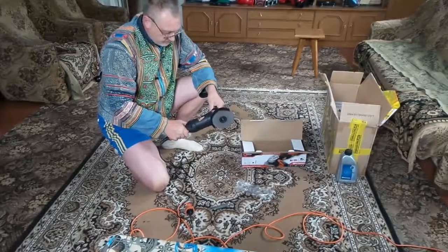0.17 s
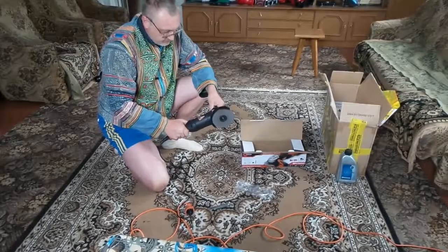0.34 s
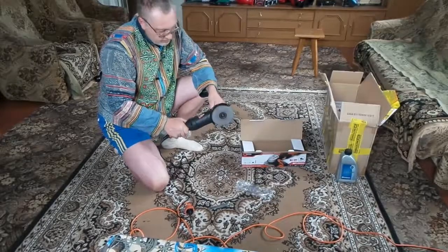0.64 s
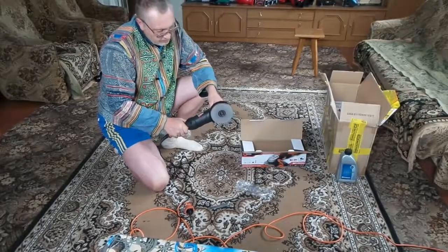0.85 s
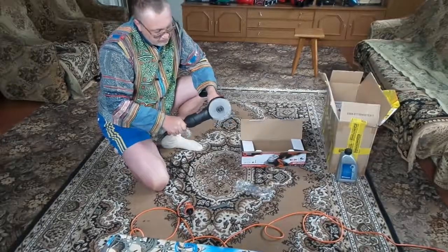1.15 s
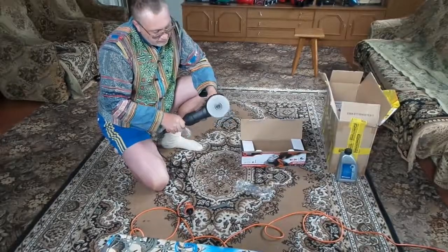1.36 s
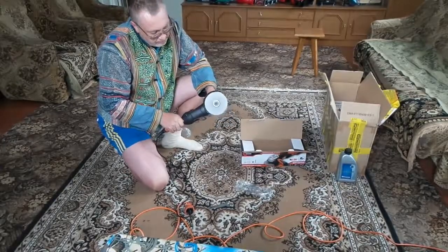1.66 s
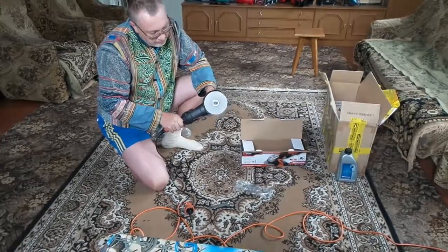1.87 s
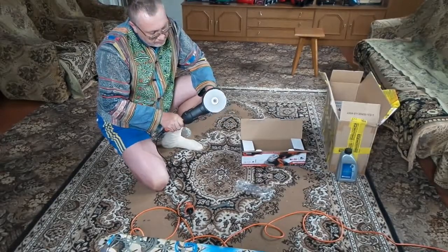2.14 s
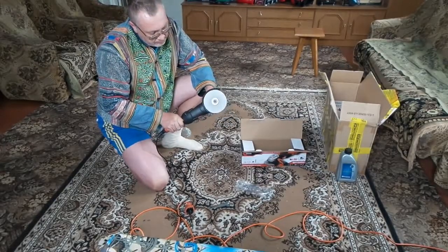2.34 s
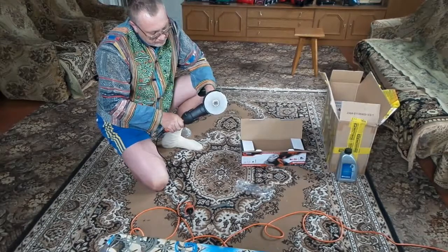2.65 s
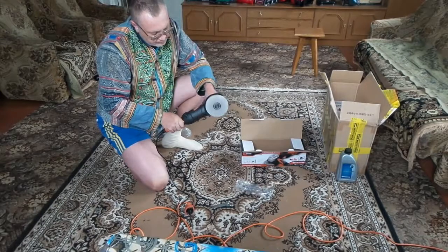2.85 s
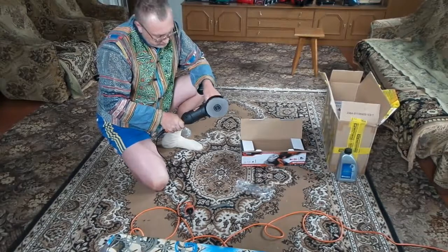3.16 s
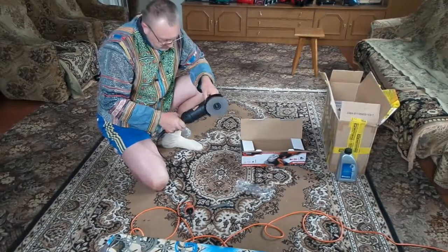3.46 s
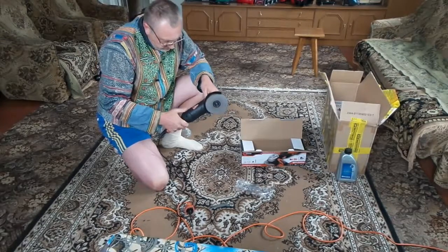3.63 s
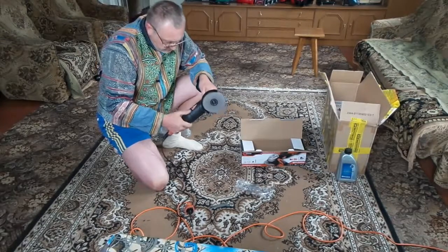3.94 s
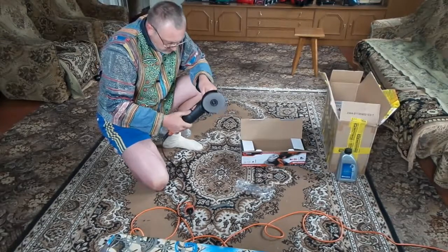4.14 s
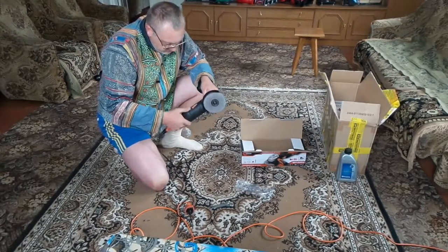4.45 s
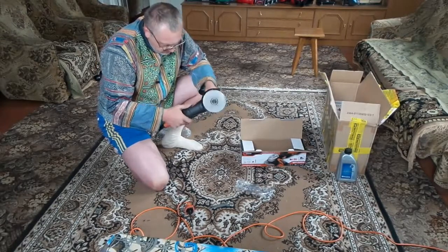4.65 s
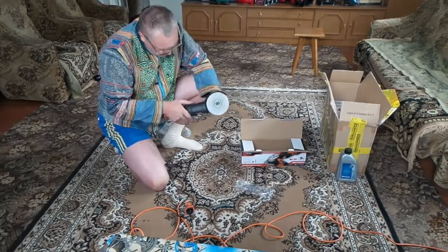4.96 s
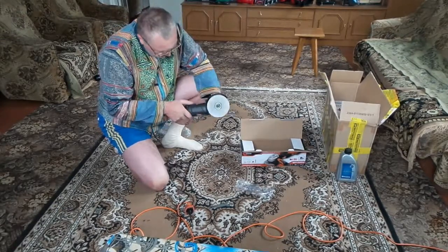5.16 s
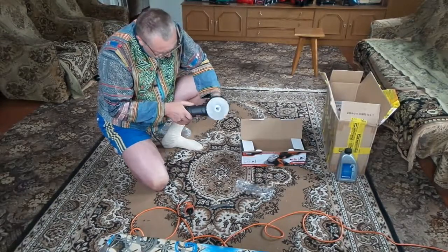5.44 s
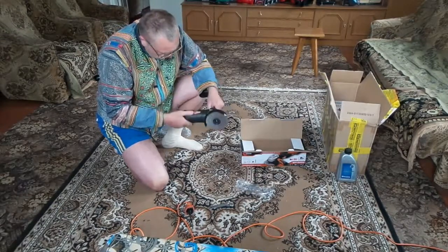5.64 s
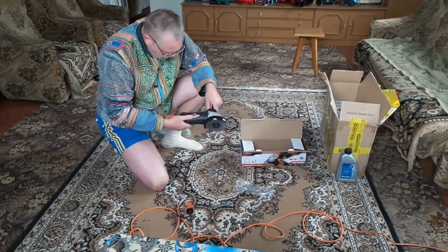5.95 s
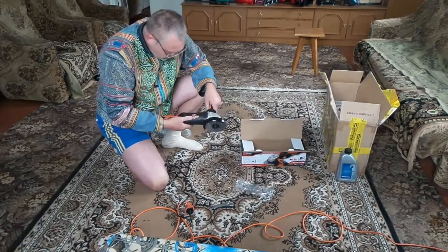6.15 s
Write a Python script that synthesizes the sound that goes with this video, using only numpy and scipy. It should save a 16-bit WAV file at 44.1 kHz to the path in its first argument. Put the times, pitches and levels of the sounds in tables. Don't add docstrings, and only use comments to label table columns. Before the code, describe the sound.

From the start an angle grinder is already spinning free at full speed: a dense, rough metallic whir, bright gear rattle, airy hiss and wavering high whines, rising very slightly until about 0.3 s. From 0.45 s it is turned down; pitch slides quickly, then more gently, settling lower by about 2.5 s. Soft low handling thumps come near 1.7 and 2.2 s, and light guard clangs from 2.7 to 3.3 s. At about 3.5 s the switch is released and pitch falls steadily. The smooth whir breaks into coarse rattling, with irregular knocks and ringing clangs strongest from 4 to 4.8 s. After 5 s it fades fast into separate dull clacks, tiny ticks around 6 s, then near silence with faint room tone and hum. Carpeted room, short reflections, stereo microphone a couple of metres away, no cutting.

```python
import sys
import numpy as np
from scipy import signal
from scipy.fft import rfft, irfft, next_fast_len
from scipy.io import wavfile
from scipy.ndimage import uniform_filter1d

SR = 44100
rng = np.random.default_rng(int(sys.argv[2]) if len(sys.argv) > 2 else 0)


def to_linear_factor(level_db):
    exponent = np.asarray(level_db, float) / 20
    return 10 ** exponent


def materialize(psi):
    bounded = np.clip(np.atleast_2d(psi).T, -1, 1)
    quanta = np.round(bounded * 32767).astype(np.int16)
    wavfile.write(sys.argv[1], SR, quanta)


N = 277830
OFF_S = 3.47
GEAR_RATIO = 2.96


def evened(x):
    return x / np.sqrt(np.mean(x ** 2) + 1e-20)


def columns(rows):
    s, *rest = np.transpose(rows)
    return [np.interp(np.arange(N) / SR, s, column) for column in rest]


def by_speed(law, speed_hz):
    return np.interp(speed_hz, *np.transpose(law))


def wander(top_hz):
    low_pass = signal.butter(2, top_hz, fs=SR, output="sos")
    return evened(signal.sosfilt(low_pass, rng.standard_normal(N)))


def coloured(x, outline):
    f, db = np.transpose(outline)
    size = next_fast_len(N + 4096)
    hz = np.fft.rfftfreq(size, 1 / SR)
    gain = to_linear_factor(np.interp(np.log(hz + 1), np.log(f + 1), db))
    return irfft(rfft(x, size) * gain, size)[:N]


def rings(x, modes):
    f = np.abs(np.fft.fftfreq(8192, 1 / SR)) + 1
    lowest_hz = min(mode[0] for mode in modes)
    highest_hz = max(mode[0] for mode in modes)
    power = sum(to_linear_factor(db) ** 2 / (1 + ((f - hz ** 2 / f) / width) ** 2) for hz, width, db in modes)
    power = power / (1 + (lowest_hz / 2 / f) ** 4)
    power = power / (1 + (f / highest_hz / 1.24) ** 6)
    log_gain = np.log(power + 1e-10) / 2
    phase = -np.imag(signal.hilbert(log_gain))
    body = np.fft.ifft(np.exp(log_gain + 1j * phase)).real[:4096]
    return signal.oaconvolve(x, body / np.linalg.norm(body))[:N]


def chatter(x, decay_s):
    fall = np.exp(-1 / (decay_s * SR))
    return signal.lfilter([np.sqrt(1 - fall ** 2)], [1, -fall], x) * rng.standard_normal(N)


def struck(events, level_db, boost_db, most_db):
    s, peak_db = np.transpose(events)
    at = (s * SR).astype(int)
    train = np.zeros(N)
    train[at] = to_linear_factor(np.minimum(peak_db - level_db[at], most_db) + boost_db)
    return train


def quiet_room(hum_hz=370, hum_db=-74, tone_db=-61):
    # freq_hz, level_db (per Hz)
    tone_outline = [(24, 13), (40, -11), (59, -28), (142, -1.5), (186, -5), (355, 8.5), (1290, -17),
                    (1530, -36), (15000, -10.5)]
    tone = np.array([evened(coloured(v, tone_outline)) for v in rng.standard_normal((2, N))])
    return to_linear_factor(tone_db) * tone + to_linear_factor(hum_db) * np.sin(2 * np.pi * hum_hz * np.arange(N) / SR)


def low_rumble(length_s=0.1, coast_db=-72, bump_db=-5):
    # start_s, peak_db
    bumps = [(0.165, -69), (0.559, -68), (1.256, -74), (1.704, -53.5), (1.836, -82), (2.236, -54),
             (2.609, -59), (2.8, -56), (2.947, -57), (3.253, -59), (3.388, -60.5), (3.522, -61.5),
             (3.81, -72), (3.813, -66), (3.955, -53), (4.307, -66.5), (4.994, -64), (5.406, -66)]
    # freq_hz, level_db (per Hz)
    rumble_outline = [(20, -8), (60, -4), (120, -4), (260, -1), (340, -30)]
    s, peak_db = np.transpose(bumps)
    t = np.arange(0, N, 64) / SR
    humps = np.exp(-((t - s[:, None] - length_s / 2) / length_s * 3) ** 2)
    swell = np.repeat(to_linear_factor(peak_db + bump_db) @ humps, 64)[:N]
    coast = np.interp(np.arange(N) / SR, (OFF_S, 4.4, 5.8, 6.2), (0.52, 1, 0.8, .1))
    rumble = np.array([evened(coloured(v, rumble_outline)) for v in rng.standard_normal((2, N))])
    rumble = (rumble + rumble.sum(0)) / 2
    return rumble * (swell + to_linear_factor(coast_db) * coast)


def room(x, drift_hz=.7):
    # freq_hz, t60_s
    decay = [(200, .33), (1000, .28), (4000, .22), (12000, .16)]
    size = SR // 3
    taps = np.zeros((3, 2, size))
    at = np.arange(120, size - 22, 22)
    at = at + rng.integers(0, 22, (3, 2, len(at)))
    np.put_along_axis(taps, at, rng.choice([-1., 1.], at.shape), 2)
    hz, t, z = signal.stft(taps, SR, nperseg=256)
    f, t60_s = np.transpose(decay)
    fade = to_linear_factor(-60 * t / np.interp(hz, f, t60_s)[:, None])
    tails = signal.istft(z * fade, SR, nperseg=256)[1]
    tails = tails / np.linalg.norm(tails, axis=-1, keepdims=True)
    turn = 2 * np.pi * (drift_hz * np.arange(N) / SR + np.arange(3)[:, None] / 3)
    fed = x * np.sqrt(2 / 3) * np.cos(turn)
    return signal.fftconvolve(fed[:, None], tails, axes=2)[..., :N].sum(0)


def whine(speed_hz, turns, bars=24, blades=31, waver_db=2.5):
    # multiple of armature, level_db
    overtones = [(.677, -11), (2, -7), (2.56, -3), (2.71, -8), (3, 0), (4, 1), (12, 7)]
    # armature_hz, level_db
    unbalance_law = [(10, -110), (188, -72), (205, -54), (235, -54), (250, -62), (258, -59), (260, -66),
                     (266, -68), (271, -53), (325, -49), (333, -66), (342, -66), (350, -49), (390, -46),
                     (402, -37)]
    overtone_law = [(10, -100), (135, -80), (160, -58), (230, -56), (265, -52), (400, -51)]
    bar_law = [(10, -110), (185, -62), (215, -42), (228, -38), (254, -37), (259, -46), (290, -57),
               (335, -64)]
    blade_law = [(10, -110), (185, -62), (220, -54), (270, -54), (300, -59), (328, -58), (345, -47),
                 (400, -47)]
    orders = [(1, unbalance_law, 0), (bars, bar_law, 0), (blades, blade_law, 0)]
    orders = orders + [(k, overtone_law, db) for k, db in overtones]
    lines = np.zeros(N)
    for k, law, db in orders:
        waver = waver_db * wander(3.3) * (1.3 + (1 < k < 20))
        level = np.sqrt(2) * to_linear_factor(by_speed(law, speed_hz) + db + waver)
        lines += level * np.sin(2 * np.pi * (k * turns + rng.random()))
    return lines


def backlash(turns, size_db=14, spread_db=4, miss=0.21):
    slap = np.diff(np.floor(turns / GEAR_RATIO + .4 * wander(20)), prepend=0) > 0
    keep, size = rng.random(N), rng.standard_normal(N)
    coasting = np.arange(N) > OFF_S * SR
    return slap * (keep > miss) * coasting * to_linear_factor(size_db + spread_db * size)


def teeth(turns, wobble=0.34):
    # start_s, knocks per s, size spread_db, smooth air noise share 0-1
    rattle = [(0, 2500, 3.5, .5), (2, 2200, 3.2, .5), (3.4, 2000, 3.2, .5), (4, 1500, 2.8, .5),
              (5.5, 900, 2.6, .5), (6.3, 500, 2.2, .6)]
    rate_hz, spread_db, air = columns(rattle)
    draw, size = rng.random((2, N))
    knock_db = spread_db * np.minimum(-np.log(size + 1e-9), 3.5)
    hits = to_linear_factor(knock_db) * (draw < rate_hz / SR)
    hits = hits / np.sqrt(uniform_filter1d(hits ** 2, SR // 3) + 1e-9)
    eccentric = 1 + np.clip(wobble, 0, .4) * np.cos(2 * np.pi * turns / GEAR_RATIO)
    return hits * eccentric, np.clip(air, 0, 1)


def gears(speed_hz, turns, face_db=-8, ring_db=-11, shell_db=-6, flutter_db=0.68, hiss_rattle=0.5):
    # start_s, head_db, disc face toward listener_db, disc rim toward listener_db
    loudness = [(0, -17, -8, 5), (.1, -18, -2.5, -46), (1, -20, -4, -32), (1.2, -19, -2, -27),
                (2.7, -20.5, 2, -23), (3.4, -19.5, 2, -3), (3.8, -20, -1, 5), (4.45, -24.5, 1, 1),
                (4.7, -25.5, 5, -4), (5.15, -28, 4.5, 0), (5.75, -38, -1.5, -1), (5.96, -49.5, 6, -17),
                (5.99, -47, 1, -4), (6.2, -64, 4, 0), (6.3, -76.5, 8, -8)]
    # start_s, peak_db
    coast_knocks = [(3.5622, -12), (3.5891, -1), (3.8016, -15), (3.9413, -13), (3.9827, -24), (4.066, -9),
                    (4.1189, -9), (4.1903, -9), (4.2142, -5), (4.3015, -5.5), (4.3349, -7.5),
                    (4.3614, -7.5), (4.4497, -4), (4.4726, -8), (4.5584, -8), (4.6417, -9.5), (4.6732, -10),
                    (4.7754, -3), (4.8084, -12.5), (4.8692, -9), (5.0453, -9), (5.0787, -15.5),
                    (5.0987, -19.5), (5.1645, -14.5)]
    # start_s, peak_db
    last_knocks = [(5.2694, -23), (5.3264, -14.5), (5.3974, -18), (5.463, -17), (5.6156, -27),
                   (5.6446, -37), (5.6775, -21), (5.7079, -41), (5.7369, -29), (5.8596, -26), (5.9095, -37),
                   (5.9718, -26.5), (6.0297, -32.5), (6.1584, -36.5)]
    # start_s, peak_db
    guard_clangs = [(2.6998, -22), (2.7846, -14), (2.8015, -26), (2.8251, -10.5), (2.976, -18),
                    (3.012, -25), (3.0864, -21), (3.1278, -16), (3.212, -21), (3.274, -12), (3.5404, -19),
                    (3.564, -25), (3.613, -12), (3.6431, -20.5), (3.8815, -17.5), (4.071, -7),
                    (4.1214, -10), (4.2263, -23), (4.2867, -15), (4.3366, -12), (4.421, -10), (4.4508, -17),
                    (4.5091, -11), (4.5347, -8), (4.5607, -9), (4.5935, -17), (4.6194, -24), (4.6743, -12),
                    (4.7423, -5), (4.7777, -13),
                    (5.3762, -20.5), (5.446, -20.5), (5.6166, -23), (5.662, -28), (5.684, -47),
                   (5.8192, -27), (5.91, -33), (5.9714, -51), (6.0492, -41), (6.1599, -41)]
    # freq_hz, width_hz, level_db
    head_modes = [(2420, 98, -9.5), (3770, 490, -2.5), (4130, 370, -0.5), (4740, 530, -1.5),
                  (4800, 410, 3.5), (5190, 130, -9), (3880, 657, -3.5), (2030, 320, -10.5)]
    guard_modes = [(1480, 60, -13), (1625, 45, 0), (1760, 50, -4), (1890, 80, -14), (1700, 500, -25)]
    casing_modes = [(690, 100, 8.5), (903, 333, 7), (954, 200, 6.5), (1344, 150, -34), (540, 100, -23),
                    (270, 25, -17.5), (407, 100, -33.5)]
    shell_modes = [(7030, 150, 0), (8370, 120, -12), (12000, 500, -13)]
    face_modes = [(3194, 120, 0.5), (3510, 310, -0.5)]
    rim_modes = [(5370, 60, 0)]
    # freq_hz, level_db (per Hz)
    hiss_outline = [(1500, -30), (2300, 0), (5800, 2), (7400, -1), (8200, -6), (10000, -10), (11000, -13),
                    (13000, -12.5), (15500, -15), (16500, -40)]
    # full speed_db, gain toward rest_db, lateness exponent
    guard_law = (-12.5, 15.6, 1.05)
    casing_law = (-17, 35, 24)
    hiss_law = (-11, -15, 4.3)
    # armature_hz, width_hz, gain_db
    guard_shake = (141, 31.4, 2.87)
    full_hz, loose_hz = 400, 264

    head_db, turn_db, rim_db = columns(loudness)
    guard_db, casing_db, hiss_db = (head_db + full + gain * np.abs(1 - speed_hz / full_hz) ** late
                                    for full, gain, late in (guard_law, casing_law, hiss_law))
    shake_hz, shake_width_hz, shake_db = guard_shake
    guard_db = guard_db + shake_db * np.exp(-((speed_hz - shake_hz) / shake_width_hz) ** 2)

    hits, air = teeth(turns)
    slaps = backlash(turns)
    blows = struck(coast_knocks, head_db, 15.5, 17) + struck(last_knocks, head_db, 16, 25)
    knocks = chatter(blows + slaps, .003)
    clangs = struck(guard_clangs, guard_db, boost_db=18, most_db=17) + .9 * slaps
    flutter = to_linear_factor(flutter_db * wander(37))
    noise = flutter * rng.standard_normal((5, N))
    drive = np.sqrt(1 - air) * flutter * chatter(hits, 0.00029) + np.sqrt(air) * noise[:3]

    metal = drive[0] + knocks
    head = rings(metal, head_modes)
    face = to_linear_factor(face_db + turn_db) * rings(metal, face_modes)
    rim = to_linear_factor(ring_db + rim_db) * rings(drive[2], rim_modes)
    guard = rings(np.where(speed_hz < loose_hz, .75, 1) * drive[1] + clangs, guard_modes)
    casing = rings(drive[2], casing_modes)
    fizz = hiss_rattle * (chatter(hits, 0.00036) + knocks) + noise[3:]
    hiss = evened(coloured(fizz[0], hiss_outline))
    hiss = hiss + to_linear_factor(shell_db) * evened(rings(fizz[1], shell_modes))
    return (to_linear_factor(head_db) * (head + face + rim) + to_linear_factor(guard_db) * guard
            + to_linear_factor(casing_db) * casing + to_linear_factor(hiss_db) * evened(hiss))


def scene():
    # start_s, armature_hz
    speed_track = [(0, 398), (.2, 405.5), (.32, 408), (.44, 403), (.68, 374.5), (.92, 348.3), (1.16, 327.5),
                   (1.4, 309), (1.7, 292.5), (2, 281), (2.4, 270), (2.8, 263), (3.45, 257.6), (3.56, 246.4),
                   (3.92, 203), (4.4, 150), (5, 100), (6.3, 10)]
    # freq_hz, level_db
    wall_outline = [(300, -4), (1300, -5), (2500, -1), (5000, 0), (9000, 3.5), (15000, 5)]
    speed_hz = columns(speed_track)[0]
    turns = np.cumsum(speed_hz) / SR
    noise = gears(speed_hz, turns)
    lines = whine(speed_hz, turns)
    direct = to_linear_factor(-2.5) * noise + lines
    return direct + to_linear_factor(-1.5) * room(coloured(noise + lines / 5, wall_outline))


def top_cut(x):
    return signal.sosfilt(signal.butter(12, 15730, fs=SR, output="sos"), x)


def record(dry):
    # freq_hz, level_db
    balance = [(60, 1.0), (120, 0.5), (240, 0.0), (480, -1.0), (950, 0.0), (1890, -1.0), (3770, -3.0),
               (7520, -3.5), (15000, -2.5)]
    # freq_hz, level_db
    mic_outline = [(30, -40), (160, -36), (215, 0), (15450, 0), (15750, -50)]
    ceiling = 0.83
    sides = [[(hz, side * db / 2) for hz, db in balance] for side in (1, -1)]
    x = ceiling * np.tanh(dry / ceiling)
    x = np.array([coloured(coloured(v, mic_outline), side) for v, side in zip(x, sides)])
    return top_cut(x + low_rumble() + quiet_room())


dry = scene()
out = record(dry)
materialize(out)
```